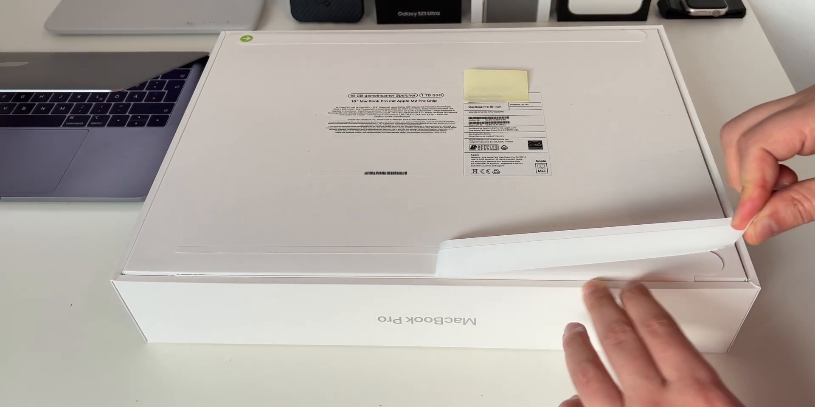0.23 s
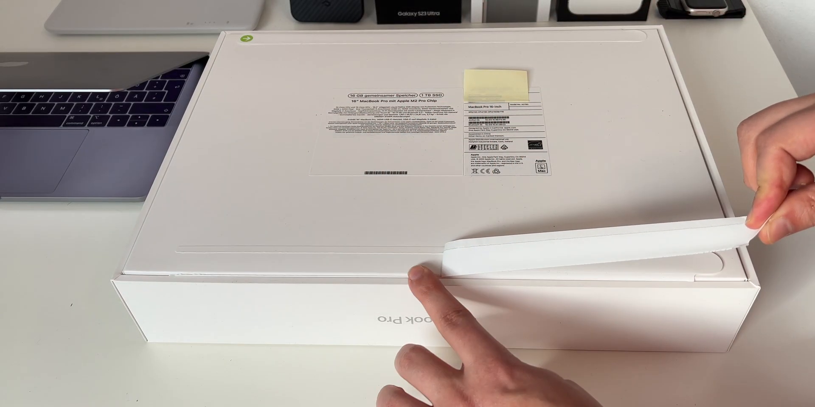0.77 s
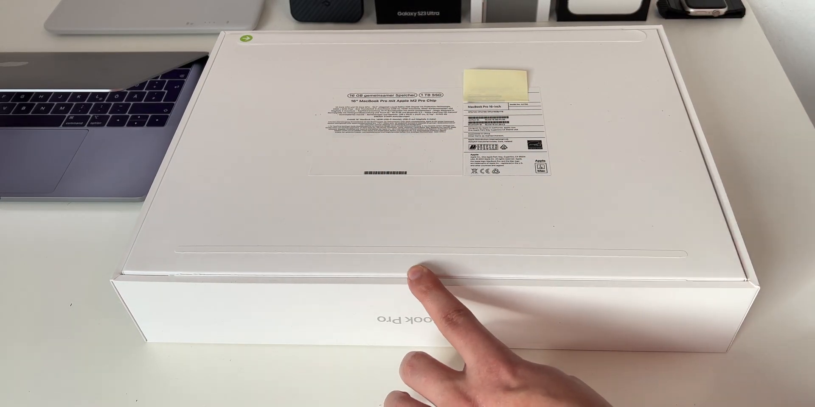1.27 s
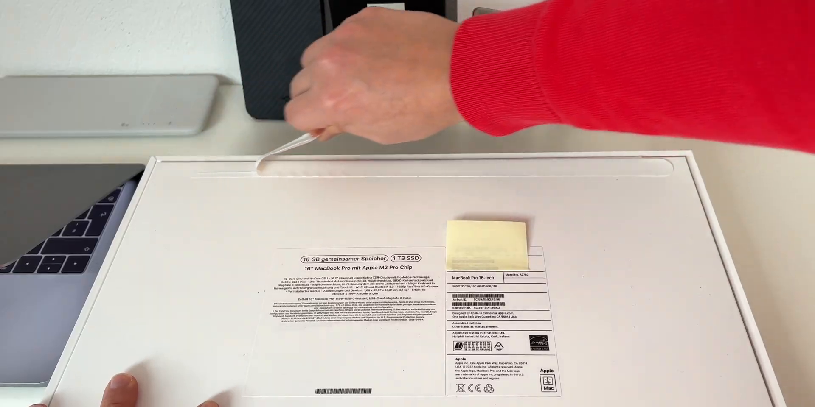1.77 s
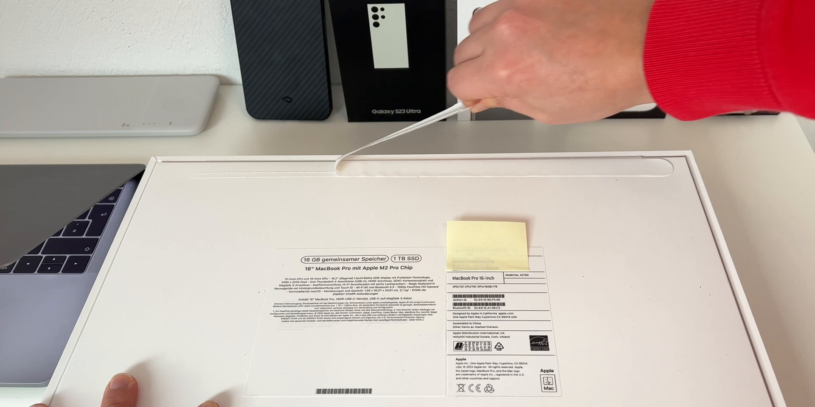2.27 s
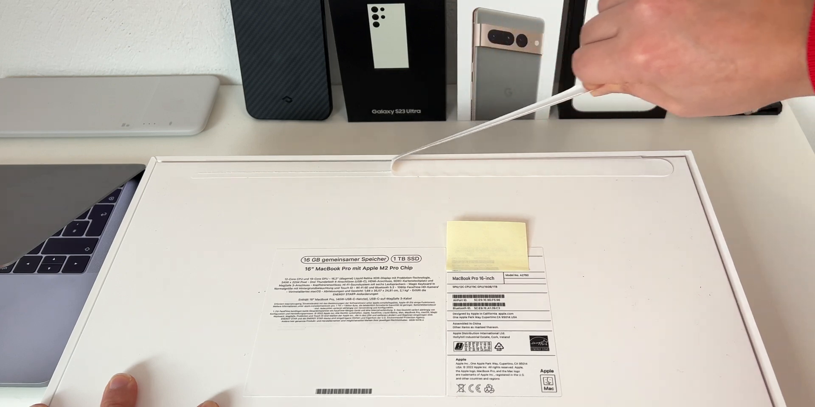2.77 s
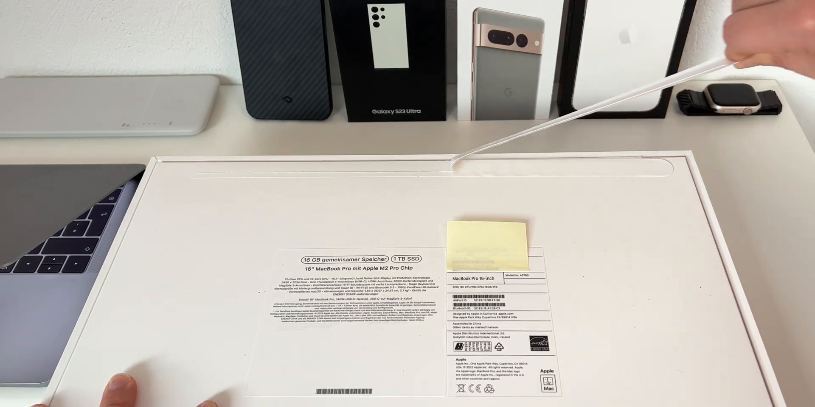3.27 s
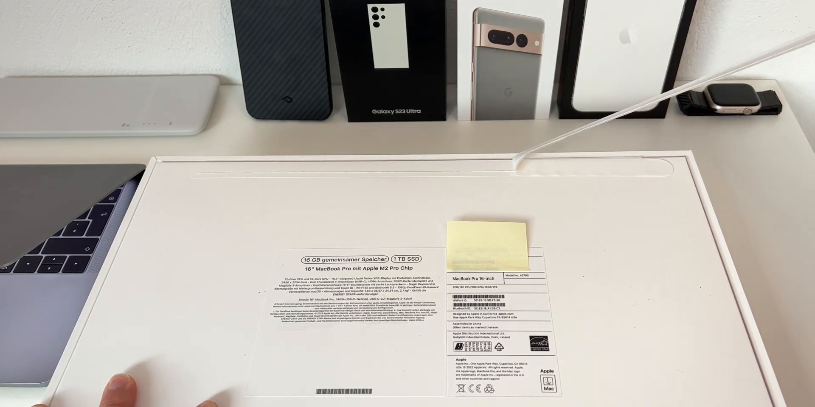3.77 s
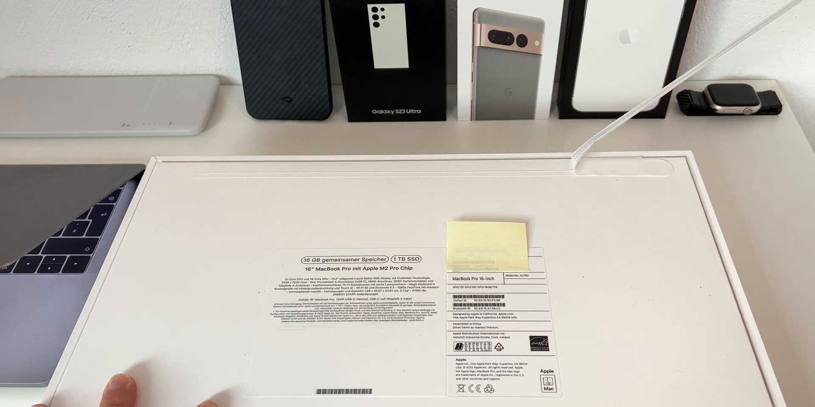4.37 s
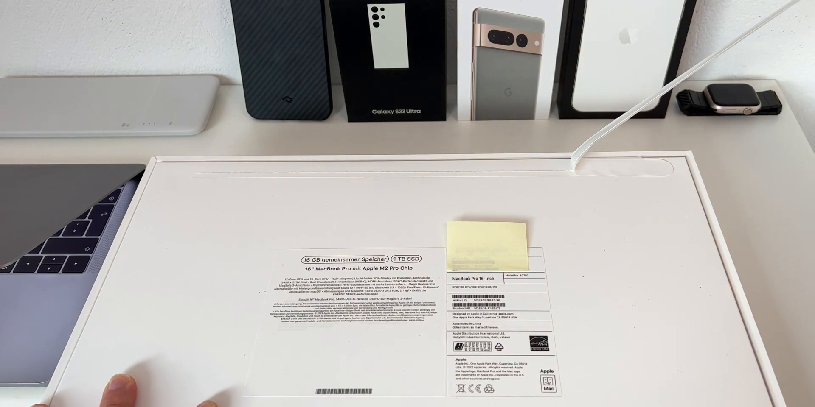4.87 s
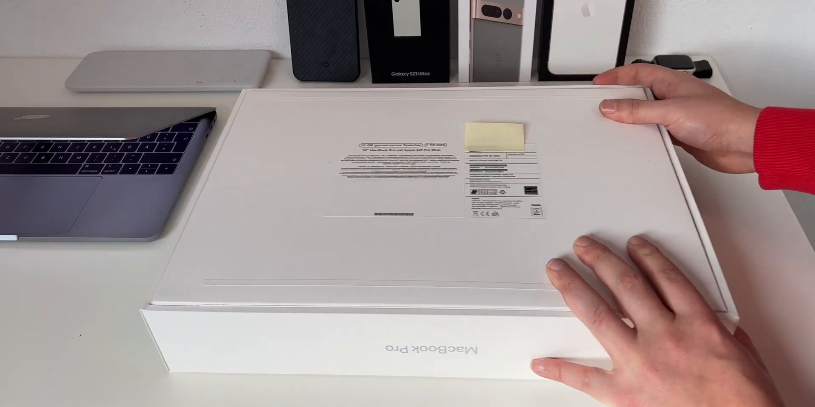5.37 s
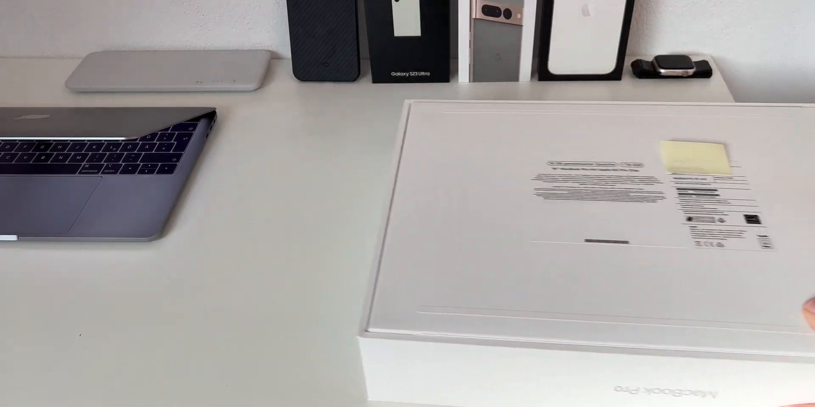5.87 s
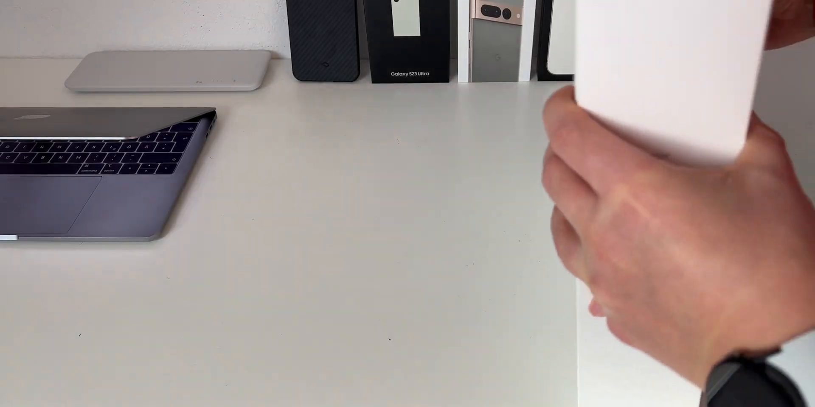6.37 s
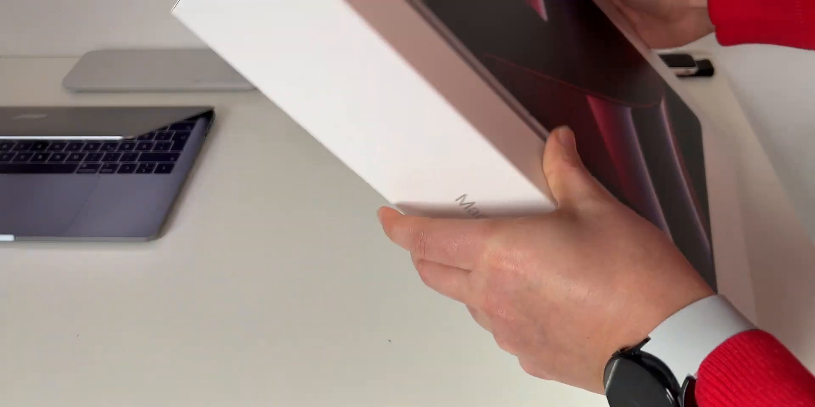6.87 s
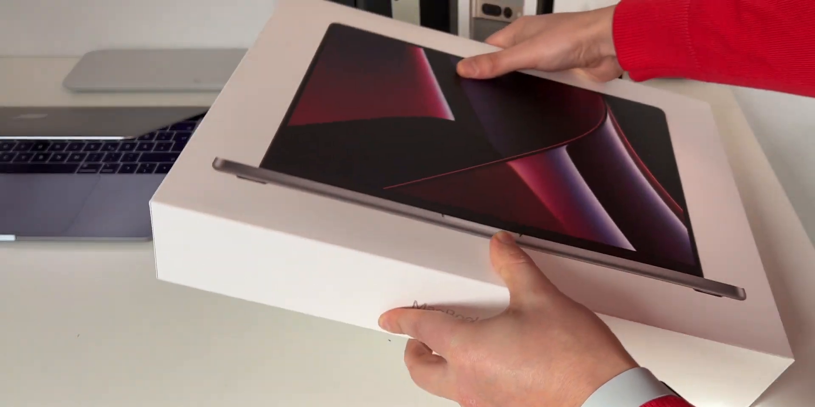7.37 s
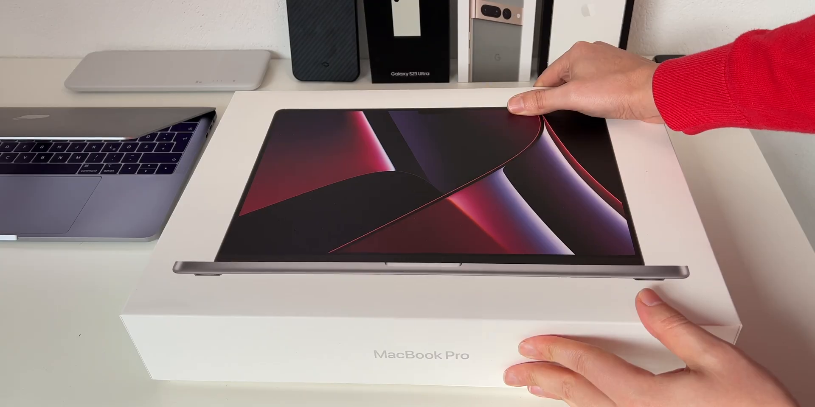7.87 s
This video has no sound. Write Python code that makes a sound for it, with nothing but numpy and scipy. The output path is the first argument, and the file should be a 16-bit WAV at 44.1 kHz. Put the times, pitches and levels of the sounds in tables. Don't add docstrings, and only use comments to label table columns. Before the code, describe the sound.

Close up in a quiet room, short pulls tick a loose paper tab on a cardboard box, then a quick loud rip. A long strip peels slowly with clumped crackling snaps, ending in a hard tear. The box is knocked and slid over a desk, lifted, rubbed by hands and set down with a heavy, boomy thud. Cuts chop some tails short.

```python
import sys
import numpy as np
from scipy import signal
from scipy.fft import rfft, irfft, next_fast_len
from scipy.io import wavfile
from scipy.ndimage import uniform_filter1d

SR = 44100
rng = np.random.default_rng(int(sys.argv[2]) if len(sys.argv) > 2 else 0)


def store_pcm(level_fs):
    pcm = np.round(np.clip(level_fs, -1, 1) * 32767).astype(np.int16)
    wavfile.write(sys.argv[1], SR, np.atleast_2d(pcm).T)


def volts_from_decibels(level):
    exponent = np.asarray(level, float) / 20
    return 10 ** exponent


N = 357651

CLOCK_S = np.arange(N) / SR
STEP = 32
SLOW_S = np.arange(0, N + STEP, STEP) / SR
SIZE = next_fast_len(N)
HZ = np.fft.rfftfreq(SIZE, 1 / SR) + 1

# start_s, pull_db, strip_resonance_hz, left_right_db, ring_lift_db
TEARS = [
    [(0.0, -39.5, 3560, 8.5, 13.5), (0.1, -44.5, 3640, 9, -15), (0.264, -49.5, 3560, 6.5, 4),
     (0.36, -71, 4180, 7, 0), (0.42, -81, 4310, 6, 0)],
    [(0.88, -87, 3440, 11, 0), (0.936, -45.5, 2960, 3.5, 5), (1.038, -29.5, 2770, 4, 19),
     (1.11, -27, 2900, 3.5, -2), (1.156, -27.5, 2980, 4.5, -14), (1.188, -28, 3500, 2, -6),
     (1.2, -31.5, 3340, -33, 0)],
    [(1.39, -49.5, 6150, 7, -7), (1.42, -40, 6200, 9.5, 19.5), (1.58, -39.5, 5730, 9.5, 14),
     (1.7, -37.5, 5360, 7.5, 8.5), (1.9, -38, 5900, 6, 2), (2.2, -42, 5850, 9, 13.5),
     (2.45, -42, 5500, 10, 5), (2.7, -40.5, 4570, 7, -16), (2.95, -39.5, 5750, 7, -12),
     (3.15, -41.5, 5770, 6, -13), (3.24, -42, 3970, 7.5, 3), (3.45, -41, 3800, 5.5, 5),
     (3.62, -41.5, 3800, 5.5, 9.5), (3.78, -41.5, 3850, 5.5, 5), (3.9, -41, 3950, 6.5, 9),
     (4.1, -42.5, 4000, 6, 8), (4.26, -45.5, 4000, 5, 11), (4.34, -74, 4000, 5.5, 13)],
    [(4.92, -73, 4190, 4, -4.5), (4.95, -36, 4250, 3.5, 12.5), (4.99, -29, 4140, 1, 8),
     (5.014, -23, 4000, 6.5, 3.5), (5.023, -20.5, 3800, 6, -3)],
]
CUTS = [0, 1.391, 5.071, 5.332, 6.04, 6.748, 7.874]


def fine(slow):
    return np.interp(CLOCK_S, SLOW_S, slow)


def in_time(strokes, fade_s=0.0063):
    gate = 0
    for rows in strokes:
        start, end = rows[0][0], rows[-1][0]
        gate = gate + np.interp(SLOW_S, [start - fade_s, start, end, end + fade_s], [0, 1, 1, 0])
    s, *columns = np.vstack(strokes).T
    return [fine(np.minimum(gate, 1))] + [np.interp(SLOW_S, s, column) for column in columns]


def layered(strokes, mixes, follows):
    out = []
    for rows, mix, share in zip(strokes, mixes, follows):
        rows = np.array(rows, float)
        peak_db = rows[:, 1].max()
        levels_db = peak_db + np.array(mix) + (rows[:, 1:2] - peak_db) * share
        out.append(np.c_[rows[:, 0], levels_db, rows[:, 2:]])
    return out


def at_hz(points, hz):
    points_hz, values = np.array(points).T
    return np.interp(np.log(hz), np.log(points_hz), values)


def rms_one(x):
    return x / np.sqrt(np.mean(x ** 2) + 1e-20)


def drift(rate_hz):
    r = np.exp(-2 * np.pi * rate_hz * STEP / SR)
    noise = rng.standard_normal(len(SLOW_S) + 800)
    return rms_one(signal.lfilter([1], [1, -2 * r, r * r], noise)[800:])


def band(x, low_hz, high_hz):
    return signal.sosfilt(signal.butter(2, [low_hz, min(high_hz, .45 * SR)], "band", fs=SR, output="sos"), x)


def gaps(table):
    gain = 1
    for centre_hz, width_hz, depth in table:
        gain = gain * (1 - min(depth, 1) * np.exp(-((HZ - centre_hz) / (width_hz / 2)) ** 4))
    return gain


def shape(x, gain):
    return irfft(rfft(x, SIZE) * gain, SIZE)[..., :N]


def colour(x, spectra, other, levels_db, bump_db=0, bump_hz=4000, bump_octaves=0.3, patchy_db=0):
    edges = 38 * 2 ** np.arange(0, 8.9, 1 / 4)
    low, high = edges[:-1], edges[1:]
    hz = np.sqrt(low * high)
    first, second = (at_hz(s, hz)[:, None] for s in spectra)
    bump = np.exp(-(np.log2(hz[:, None] / bump_hz) / bump_octaves) ** 4)
    gain = volts_from_decibels(np.where(other, second, first) + bump_db * bump)
    group = np.searchsorted([600, 1800, 5000], hz)
    for g, db in enumerate(levels_db):
        power = (high - low)[group == g] @ gain[group == g] ** 2 / (SR / 2)
        gain[group == g] *= volts_from_decibels(db) / np.sqrt(power)
    out = 0
    for k in range(len(hz)):
        out = out + (-1) ** k * fine(gain[k] * volts_from_decibels(patchy_db * drift(9.2))) * band(x, low[k], high[k])
    return out


def place(x, pan_db, lead):
    early = np.interp(np.arange(N) + lead, np.arange(N), x)
    return np.array([early * volts_from_decibels(pan_db / 2), x * volts_from_decibels(-pan_db / 2)])


def room_tone():
    # pitch_hz, level_db per Hz
    tone_spectrum = [(15, -44.5), (25, -29.5), (38, -18.5), (53, 1), (66, -11.5), (80, -9.5), (197, -25.5),
                     (399, -29), (1320, -39), (7510, -47.5), (10100, -54.5), (11900, -48.5), (16500, -74.5)]
    mid, side = shape(rng.standard_normal((2, N)), volts_from_decibels(at_hz(tone_spectrum, HZ)))
    out = mid + shape(side, np.clip(HZ / 600, .15, 1)) * [[1], [-1]]
    return volts_from_decibels(-59.5) * out / np.std(mid)


def room(x, cuts):
    # pitch_hz, t60_s
    decay = [(100, 0.37), (400, 0.25), (2000, 0.21), (8000, 0.23)]
    t, tail = np.arange(SR // 2) / SR, 0
    mid, side = rng.standard_normal((2, SR // 2))
    for low in 40 * 2. ** np.arange(9):
        apart = np.clip(low / 900, .1, 1)
        pair = band(mid, low, 2 * low) + apart * band(side, low, 2 * low) * [[1], [-1]]
        dying = 0.17 * volts_from_decibels(-60 * t / at_hz(decay, 1.0 * low)) + np.exp(-t / 0.0025)
        tail = -tail + pair * dying * (t > .0015)
    tone = rfft(tail)
    power = np.abs(tone) ** 2
    even = np.sqrt(uniform_filter1d(power, size=40) + .02 * np.mean(power))
    tail = irfft(tone / even, SR // 2) * (t < .4)
    tail, out = tail / np.sqrt(np.sum(tail ** 2) / 2), np.zeros((2, N))
    marks = [round(c * SR) for c in cuts] + [N]
    for a, b in zip(marks, marks[1:]):
        wet = signal.fftconvolve(x[None, a:b], tail, axes=1)[:, :b - a]
        out[:, a:b] = wet * np.clip(np.arange(b - a, 0, -1) / 90, 0, 1)
    return out


def strip_ring(fibres, strip_hz, width_hz):
    turn = np.exp(2j * np.pi * np.cumsum(fine(strip_hz)) / SR)
    narrow = signal.butter(2, width_hz / 2, fs=SR, output="sos")
    return rms_one((signal.sosfilt(narrow, fibres / turn) * turn).real)


def parting_fibres(fast):
    clump_db = 0.9 * drift(50) + 1.4 * drift(200)
    clump = fine(volts_from_decibels(np.where(fast, 0.5, 1) * clump_db))
    fibres_per_s, spread_db, fuzz = 800, 3.0, 0.45
    sizes = volts_from_decibels(spread_db * np.minimum(rng.exponential(1, N), 4.0)) * rng.choice([-1, 1], N)
    clicks = sizes * (rng.random(N) < fibres_per_s / SR)
    return rms_one(clump * (rms_one(clicks) + fuzz * rng.standard_normal(N)))


def tearing():
    # drum_db, panel_db, crackle_db, hiss_db, strip_ring_db, lid_ring_db
    mix = [(-4, -4.5, 3.5, 7, -10.5, -22), (-5, -2, 2.6, 8, -15.5, 3), (-0.55, -5.5, -3, 8, -3.5, -27.5),
           (-6.5, 3, 2.5, 7, 1.5, -9.5)]
    follows = (0.9, 1.05, 1, 0.95, 1.5, 2.4)
    # pitch_hz, level_db per Hz
    peeled = [(24, -35), (40, -1.5), (222, 1), (367, -7), (523, -2), (624, -5.5), (1510, -19),
              (1710, -13.5), (6180, -13), (8570, -11), (10200, -19), (11600, 11), (13800, -42),
              (15300, -11.5), (16500, -34)]
    # pitch_hz, level_db per Hz
    ripped = [(24, -41), (40, -9.5), (500, 0), (1030, -17.5), (1510, -15.5), (2620, -18.5), (8360, -27),
              (9970, -18.5), (11300, -28), (15300, -20), (16500, -30)]
    # start_s, pitch_hz, level_db
    panel = [(1.4, 1540, -52), (1.8, 1390, -46), (2.2, 1170, -45.5), (2.6, 1080, -48.5), (3.0, 1010, -50.5),
             (3.4, 1300, -48), (3.8, 1350, -45.5), (4.1, 1430, -48.5), (4.3, 1470, -56)]
    # pitch_hz, width_hz, depth 0-1
    hollow = [(2500, 1300, .35), (1700, 170, .4)]
    # pitch_hz, width_hz, depth 0-1
    dips = [(165, 67, 0.6), (274, 60, 0.5), (646, 140, 0.6), (1765, 80, 0), (2200, 850, 0.23),
            (2890, 250, 0)]

    controls = in_time(layered(TEARS, mix, [follows] * len(TEARS)))
    gate, drum_db, panel_db, crackle_db, hiss_db, ring_db, lid_db, strip_hz, pan_db, lift_db = controls
    fast = ((SLOW_S > .8) & (SLOW_S < CUTS[1] - .05)) | (SLOW_S > 4.6)
    tilt_db = np.where(fast, 0.5, -7) * np.log2(strip_hz / 4630)
    fibres = parting_fibres(fast)
    jolts = fibres * rng.choice([-1, 1], N)

    levels_db = np.array([drum_db, panel_db, crackle_db - tilt_db, hiss_db + tilt_db]) - 4.5
    bump_db = np.where(fast | (SLOW_S < CUTS[1]), 3, 1.5)
    torn = colour(fibres, (peeled, ripped), fast, levels_db, bump_db=bump_db, bump_hz=strip_hz, patchy_db=1.4)
    torn = torn + fine(volts_from_decibels(ring_db + lift_db - 3.5 + 0.46 * drift(40))) * strip_ring(jolts, strip_hz, 1100)
    lid_hz, lid_width_hz = 1020, 360
    torn = torn + fine(volts_from_decibels(lid_db + 0.5)) * strip_ring(jolts, lid_hz + 0 * SLOW_S, lid_width_hz)
    s, panel_hz, sing_db = np.transpose(panel)
    sing = fine(volts_from_decibels(np.interp(SLOW_S, s, sing_db, -99, -99)))
    torn = torn + sing * strip_ring(jolts, np.interp(SLOW_S, s, panel_hz), 370)

    for row, until_s in zip(hollow, (1.65, 3.2)):
        shade = np.interp(CLOCK_S, [CUTS[1] - .01, CUTS[1], until_s, until_s + .4], [0, 1, 1, 0])
        torn = torn + shade * (shape(torn, gaps([row])) - torn)
    return place(gate * shape(torn, gaps(dips)), fine(pan_db), lead=0.3 * fine(pan_db))


def snap_rows():
    # start_s, peak_db
    strip_snaps = [(1.383, -31), (1.4033, -17), (1.416, -23), (1.4396, -18), (1.512, -19), (1.5748, -8),
                   (1.613, -14), (1.6675, -11.5), (1.714, -11), (1.84, -22), (1.8836, -12.5), (1.9668, -11),
                   (2.029, -17), (2.0856, -14), (2.1471, -31), (2.1613, -15), (2.204, -15.5), (2.2489, -43),
                   (2.3641, -17.5), (2.5106, -17), (2.669, -17.5), (2.7093, -21), (2.762, -29),
                   (2.781, -31), (2.8145, -20), (2.8874, -37), (2.9104, -18), (2.9993, -17), (3.028, -12.5),
                   (3.158, -16), (3.221, -18), (3.28, -19), (3.309, -16), (3.357, -16), (3.3824, -9.5),
                   (3.4196, -20), (3.497, -25), (3.524, -32), (3.555, -19), (3.5684, -12.5), (3.6143, -12),
                   (3.689, -19), (3.724, -14), (3.7674, -37), (3.7934, -16.5), (3.87, -14.5), (3.8945, -39),
                   (3.9057, -14.5), (3.9218, -11), (3.952, -16.5), (3.9816, -23), (4.0024, -13.5),
                   (4.0368, -16), (4.064, -14.5), (4.091, -14), (4.1376, -12), (4.194, -15),
                   (4.2253, -43.5), (4.2393, -14.5), (4.285, -20.5)]
    # start_s, peak_db, pitch_hz
    tab_snaps = [(0.0365, -16.5, 2350), (0.068, -13, 2780), (0.0907, -15, 2200), (0.1536, -18.5, 2960),
                 (0.1735, -21, 6350), (0.185, -17.5, 2820), (0.2083, -15, 2840), (0.2245, -16, 2380),
                 (0.278, -31, 6330), (0.2945, -27, 2600), (0.328, -25, 3020), (0.517, -39, 950),
                 (0.61, -34, 2500), (0.647, -35, 3000), (0.012, -21, 5030), (0.12, -18, 3000),
                 (0.3207, -23.5, 5950), (0.3604, -32, 6100), (0.4389, -52, 1990), (0.4594, -39, 6300),
                 (0.4864, -27, 5170), (0.505, -39, 900), (0.53, -44, 960), (0.5437, -40, 2170),
                 (0.565, -36, 1000), (0.5924, -29, 6140), (0.6404, -30.5, 5630), (0.8734, -54, 5280),
                 (0.9068, -35, 6350), (0.9195, -26, 3420), (0.929, -19.5, 3130), (0.964, -15, 2790),
                 (1.0425, -10, 2700), (1.118, -19, 2920), (1.1505, -23, 2700)]
    # start_s, peak_db, pitch_hz
    box_snaps = [(4.9357, -25, 4300), (4.9476, -20, 4280), (4.9975, -9, 4280), (5.0105, -7, 3820),
                 (5.523, -21, 4500), (5.546, -13, 6140), (5.9817, -11.5, 2490), (6.2546, -21, 2700),
                 (6.5947, -21.5, 3500), (6.6692, -21, 3900), (6.8616, -31.5, 910), (6.8855, -35, 930),
                 (7.3455, -46, 930), (7.423, -51, 450), (7.4892, -46, 890), (7.5191, -44, 2590),
                 (7.5585, -31, 800), (7.5874, -41, 1400), (7.6149, -37, 1404), (7.8, -32, 2020)]
    s, _, strip_hz, pan_db, _ = np.vstack(TEARS).T
    pitched = [(at, db, np.interp(at, s, strip_hz)) for at, db in strip_snaps]
    start_s, peak_db, pitch_hz = np.array(pitched + list(tab_snaps) + list(box_snaps)).T
    stray = rng.standard_normal((len(start_s), 2))
    snap_pan_db = np.interp(start_s, s, pan_db) - 7.5 + 1 * stray[:, 1]
    ring = np.repeat((2.2, 1.3, 2.6), [len(strip_snaps), len(tab_snaps), len(box_snaps)])
    return np.c_[start_s, peak_db - 1.5, pitch_hz * (1 + .05 * stray[:, 0]), snap_pan_db, ring]


def snaps():
    out, t = np.zeros((2, N + 900)), np.arange(900) / SR
    rise_s, crack_s, tail_s, tail = .0002, .0014, .006, .3
    envelope = (1 - np.exp(-t / rise_s)) * (np.exp(-t / crack_s) + tail * np.exp(-t / tail_s))
    for s, db, hz, pan_db, ring in snap_rows():
        burst = rng.standard_normal(900) * envelope
        burst = band(burst, min(hz / 2, 1300), 9000) + ring * band(burst, hz / 1.2, hz * 1.2)
        at = round(s * SR)
        out[:, at:at + 900] += volts_from_decibels(db - 4.5) * burst / np.abs(burst).max() * volts_from_decibels([[pan_db / 2], [-pan_db / 2]])
    return out[:, :N]


def sliding():
    # start_s, pressure_db
    slides = [
        [(0.42, -69), (0.502, -63), (0.63, -70), (0.7, -88)],
        [(5.076, -68), (5.09, -99), (5.2, -52), (5.26, -61), (5.308, -44), (5.4, -40), (5.52, -35.5),
         (5.688, -37), (5.856, -40), (5.976, -39), (6.03, -46.5)],
        [(6.04, -54.5), (6.116, -49), (6.196, -47), (6.276, -48.5), (6.41, -61)],
        [(6.45, -50), (6.51, -44.5), (6.6, -49), (6.67, -40), (6.745, -49)],
        [(6.75, -50.5), (6.89, -53.5), (6.95, -43), (7.052, -41), (7.124, -47), (7.256, -51.5), (7.33, -55.5),
         (7.45, -57), (7.532, -54), (7.62, -46)],
        [(7.875, -66.5), (7.95, -70), (8.11, -67)],
    ]
    # drum_db, panel_db, rasp_db, hiss_db
    mix = [(-1, -1.5, 0, 2), (-11, -4, -2, 9), (5.5, 0.5, 1.5, 5.5), (-0.5, 5, 0.5, 4), (-2.5, 5, 1, 1),
           (11.5, 7.5, -8, -7.5)]
    hand_follows = (0.58, 1.21, 1.07, 1.86)
    card_follows = (1.1, 0.55, 0.62, 1.45)
    # pitch_hz, level_db per Hz
    slid = [(24, -41), (40, -21), (81, -15.5), (156, -21.5), (222, -16), (981, -7), (4920, -15.5),
            (8790, -13), (10200, 6), (11300, -29), (13800, 2), (15300, -9.5), (16500, -21)]
    # pitch_hz, level_db per Hz
    rubbed = [(24, -47), (40, -6), (300, -3), (560, -7.5), (800, -4), (1030, -6), (1230, -5.5), (8570, -26),
              (12800, -29), (13800, -52), (15300, -22), (16500, -52)]
    follows = [hand_follows, card_follows] + [hand_follows] * (len(slides) - 2)
    gate, *levels_db = in_time(layered(slides, mix, follows), fade_s=0.039)
    rub = fine(volts_from_decibels(1.2 * drift(40))) * rng.standard_normal(N)
    lifted = (SLOW_S > CUTS[4]) | (SLOW_S < CUTS[1])
    scuff_db = 4 * np.exp(-((SLOW_S - 7.03) / 0.1) ** 4)
    rub = colour(rub, (slid, rubbed), lifted, np.array(levels_db) - 4.5, bump_db=scuff_db, bump_hz=680,
                 bump_octaves=1.05, patchy_db=np.where(lifted, 2.3, 0.8))
    return place(gate * rub, 0.97, lead=1.0)


def modes(table, damping, luck):
    t = np.arange(SR // 2, dtype=np.float32) / SR
    out = 0
    for (hz, db, t60), a, b in zip(table, *luck):
        late = np.maximum(t - 0.82 / hz ** 1.049, 0)
        swell = 1 - np.exp(-late * hz / 1.6)
        fall = -np.log(1000) * late * damping * (1 + hz / 1300) / t60
        dying = np.exp(fall) + 4.9 * np.exp(4.3 * fall)
        pair = volts_from_decibels(1.2 * a) * np.sin(2 * np.pi * hz * (1 + .03 * b) * late)
        pair = pair + volts_from_decibels(4.1 * b) * np.sin(2 * np.pi * hz * (1.06 + 0.033 * a) * late)
        out = out + volts_from_decibels(db) * swell * dying * pair
    return out / np.abs(out).max()


def knocks():
    # start_s, crack_db, wall_db, thud_db, damping factor
    blows = [(0.5162, -45, -42, -50.5, 2.7), (1.2012, 8.5, -11.5, -30.5, 3.37), (5.0226, 2, -9.5, -32, 3.4),
             (5.115, -18, -13, -30, 1.8), (5.1235, -6, -4, -25, 2.2), (5.1295, -5, -10, -30, 1.3),
             (5.1593, -4, -4, -22, 1.9), (5.819, -58, -44, -46, 0.5), (5.9823, -11.5, -19, -38.5, 2.6),
             (6.269, -25, -31, -22.5, 1.56), (6.4564, -25, -40.5, -53, 0.67),
             (6.6294, -35, -16.5, -48, 1.68), (6.6389, -17.5, -34, -26.5, 3.1),
             (6.66, -16, -24, -22.5, 1.2), (7.107, -22, -33, -44, 1), (7.556, -43, -37.5, -43, 2.4),
             (7.6284, -2.5, 5, -2.5, 0.85), (7.8065, -27, -29, -31, 1.1), (6.844, -53, -39, -49, 0.57),
             (7.119, -45, -30, -45, 0.76)]
    # pitch_hz, level_db, t60_s
    standing = [(216, 2, 0.069), (275, -14, 0.34), (341, -10, 0.34), (363.4, -14, 0.064),
                (415.5, -4.5, 0.13), (471, -9.5, 0.24), (508, -3, 0.18), (640, -5, 0.13), (737, -22, 0.064),
                (1030, -11.5, 0.17), (1120, -9.5, 0.058), (1190, -26, 0.076), (1468, -16.5, 0.066)]
    # pitch_hz, level_db, t60_s
    laid = [(110.2, -3.5, 0.3), (189.6, -5.5, 0.3), (218, 0, 0.27), (336, -10, 0.2), (374.3, -7.5, 0.23),
            (411, -8.5, 0.16), (500, -6.5, 0.14), (547, -1.5, 0.17), (685, -12.5, 0.15),
            (906, -15.5, 0.079), (1059, -22, 0.16), (1330, -7.5, 0.14), (1712, -8, 0.5), (2200, 2, 0.2)]
    # pitch_hz, level_db, t60_s
    landed = [(185, -22, 0.15), (262, -12, 0.22), (318, -7, 0.22), (362, -4, 0.33), (425, 0, 0.33),
              (480, -3, 0.3), (600, -8, 0.3), (786, -18, 0.2), (950, -11, 0.25), (1125, -16, 0.2),
              (1254, -15, 0.2), (1550, -14, 0.12), (1900, -16, 0.08)]
    # pitch_hz, level_db, t60_s
    desk = [(46.4, -1, 0.41), (66.5, -12, 0.6), (98.5, 1, 0.35), (126.4, -3.5, 0.25), (175, -5.5, 0.2)]
    out, t = np.zeros((2, N + SR)), np.arange(SR // 2) / SR
    pan_db = 9.5
    for s, crack_db, wall_db, thud_db, damping in blows:
        a, b = rng.standard_normal((2, 2, 20))
        hiss = rng.standard_normal(SR // 2)
        hard_khz = 0.719 + 0.13 * damping
        rattling = np.exp(-t * damping / 0.043)
        crack = hiss * (1 - np.exp(-t / 0.00044)) * (np.exp(-t / 0.001) + 0.084 * rattling)
        crack = band(crack, 440, 7600)
        crack = volts_from_decibels(crack_db - 8.0) * crack / np.abs(crack).max()
        crack = crack + volts_from_decibels(wall_db - 19) * band(hiss[::-1] * rattling, 1200, 2400)

        sweep_hz = 300 + 1500 * hard_khz * np.exp(-t / 0.002062)
        sweep = np.sin(2 * np.pi * np.cumsum(sweep_hz) / SR) * np.exp(-t / 0.0046)
        table = laid if 5.1 < s < 5.3 else landed if s > 7.6 else standing
        walls = [modes(table, damping, a + side * 0.81 * b) + 0.91 * sweep for side in (1, -1)]
        walls[1] = np.interp(t - 0.00025, t, walls[1])

        blow = crack + volts_from_decibels(wall_db + 2.5) * band(np.array(walls), 63, 1000 * hard_khz)
        blow = blow * volts_from_decibels([[pan_db / 2], [-pan_db / 2]])
        blow = blow + volts_from_decibels(thud_db + 4.0) * band(modes(desk, damping, 0.5 * a), 36, 900)
        next_cut_s = min([c for c in CUTS if c > s] + [N])
        blow = blow * np.clip((next_cut_s - s - t) / 0.0017, 0, 1)
        at = round(s * SR)
        out[:, at:at + SR // 2] += blow
    return out[:, :N]


def singing():
    # start_s, peak_s, end_s, pitch_hz, width_hz, level_db
    panels = [(6.925, 7.005, 7.12, 530, 200, -38.5), (6.926, 7.06, 7.12, 1070, 260, -38.5),
              (7.12, 7.297, 7.6, 2500, 350, -58), (7.875, 8.05, 8.2, 480, 160, -50),
              (7.946, 8.04, 8.2, 1750, 700, -57.5), (5.975, 6.0, 6.04, 250, 150, -51)]
    rub = rng.standard_normal(N)
    out = 0
    for start, peak, end, hz, width_hz, db in panels:
        swell = np.interp(CLOCK_S, [start, peak, end], [0, 1, 0]) ** .5
        out = out + volts_from_decibels(db) * swell * rms_one(band(rub, hz - width_hz / 2, hz + width_hz / 2))
    return out


def scene():
    paper = tearing() + snaps()
    rub = sliding() + singing()
    blows = knocks()
    chopped = room(volts_from_decibels(-1.0) * paper.mean(axis=0) + volts_from_decibels(-3.0) * blows.mean(axis=0), CUTS)
    unbroken = room(volts_from_decibels(-4) * rub.mean(axis=0), CUTS[:1])
    return paper + rub + blows + chopped + unbroken + room_tone()


def top_cut(x):
    return signal.sosfilt(signal.butter(12, 16600, fs=SR, output="sos"), x)


def record(dry):
    # pitch_hz, left_right_db
    lean = [(70, -2.3), (200, -6.5), (700, -3), (3000, 0.6), (9000, -1)]
    # pitch_hz, width_hz, depth 0-1
    treble_gaps = [(10150, 1500, .93), (13800, 1500, .92)]
    ports = volts_from_decibels(at_hz(lean, HZ) / 2 * [[1], [-1]])
    top = 1 / (1 + np.minimum(HZ / 15800, 1.2) ** 200)
    mix = np.clip(shape(dry, ports * top * gaps(treble_gaps)), -1, 1)
    return top_cut(mix)


dry = scene()
out = record(dry)
store_pcm(out)
```